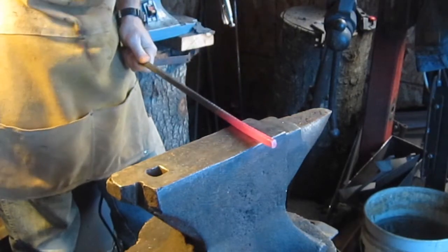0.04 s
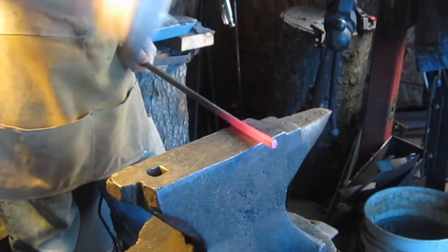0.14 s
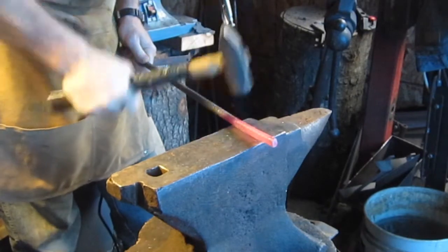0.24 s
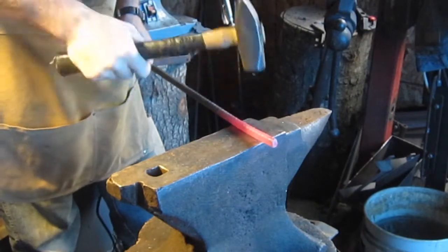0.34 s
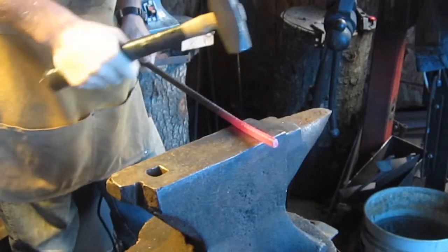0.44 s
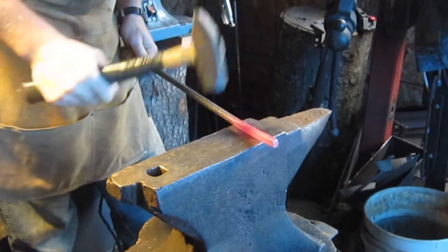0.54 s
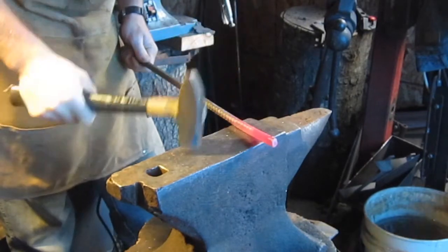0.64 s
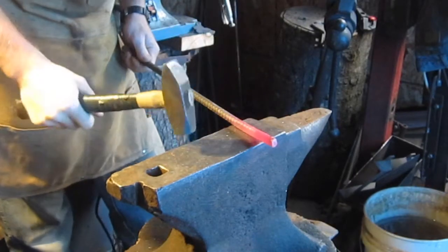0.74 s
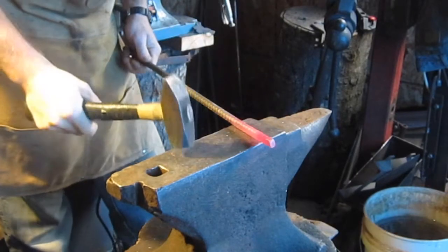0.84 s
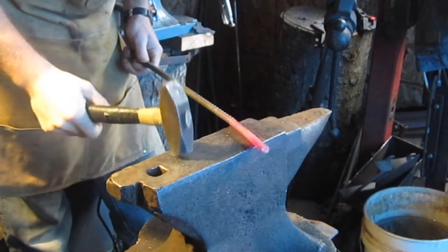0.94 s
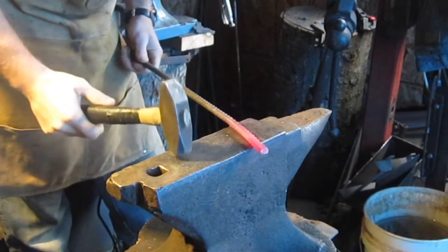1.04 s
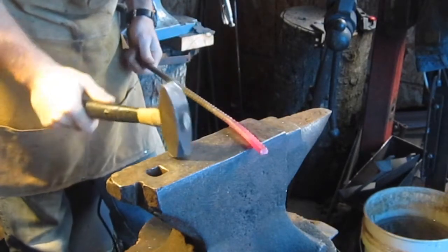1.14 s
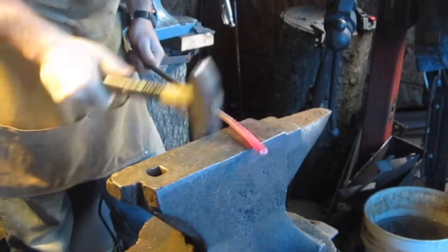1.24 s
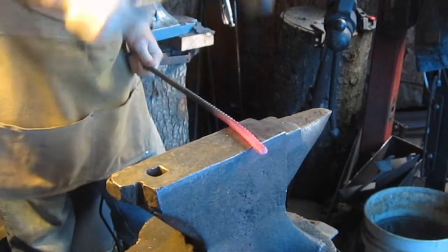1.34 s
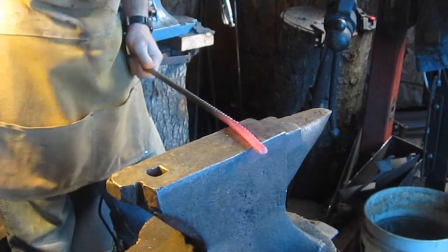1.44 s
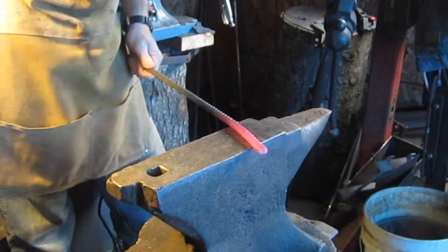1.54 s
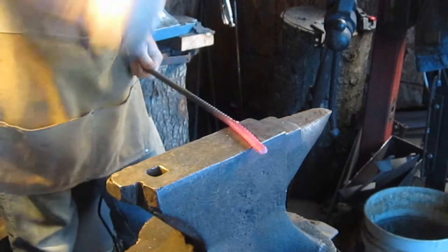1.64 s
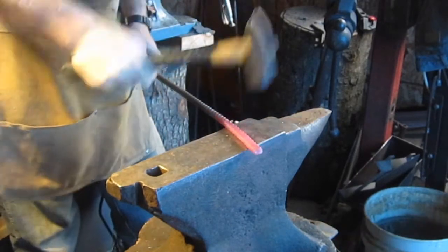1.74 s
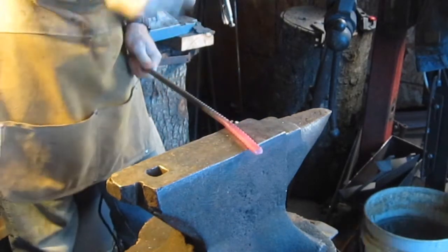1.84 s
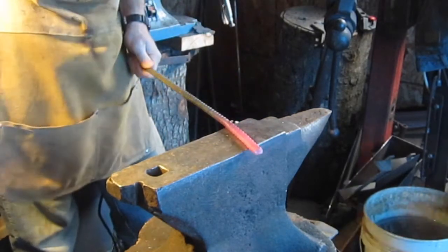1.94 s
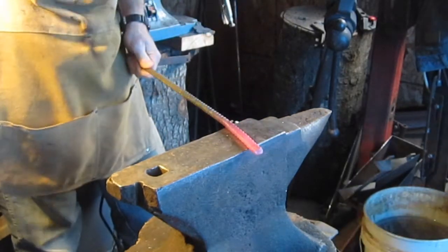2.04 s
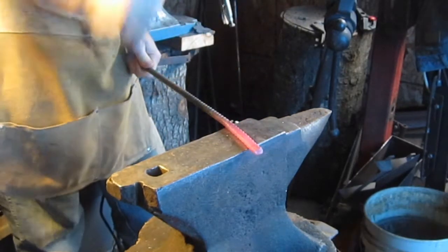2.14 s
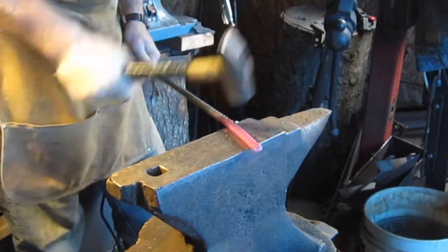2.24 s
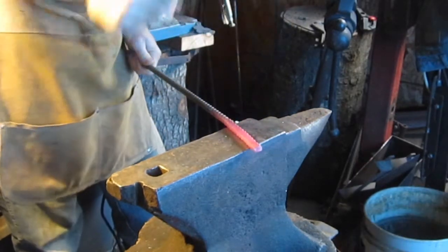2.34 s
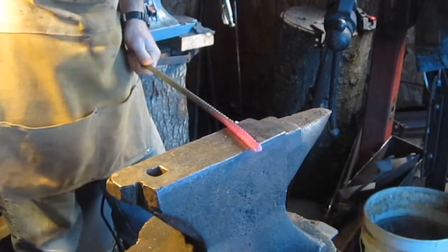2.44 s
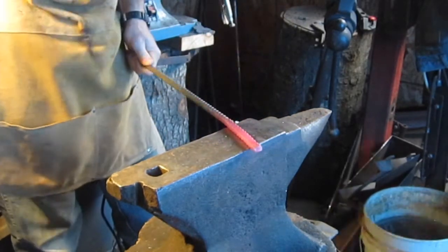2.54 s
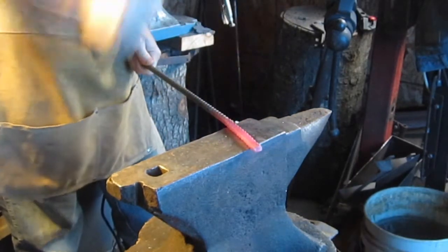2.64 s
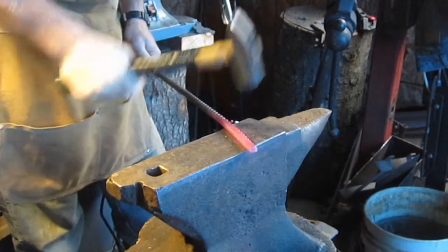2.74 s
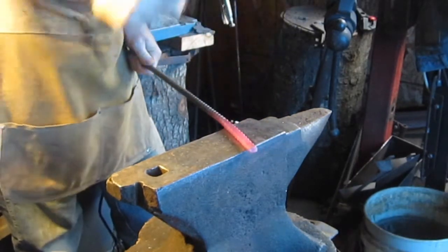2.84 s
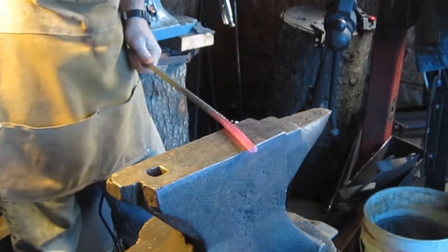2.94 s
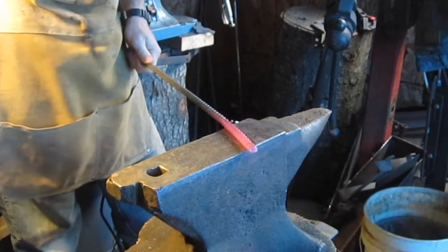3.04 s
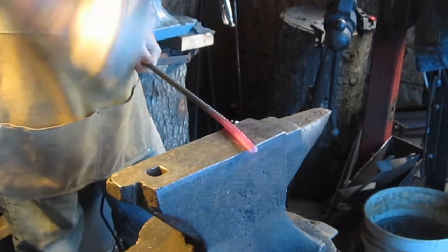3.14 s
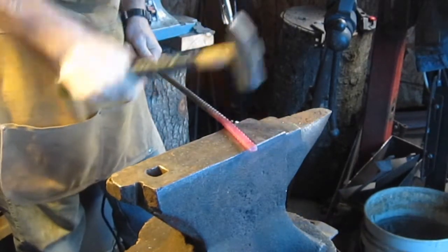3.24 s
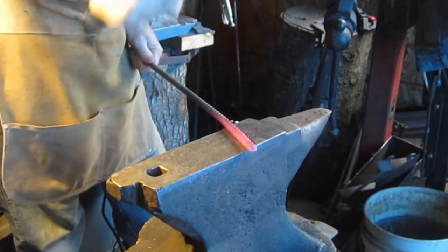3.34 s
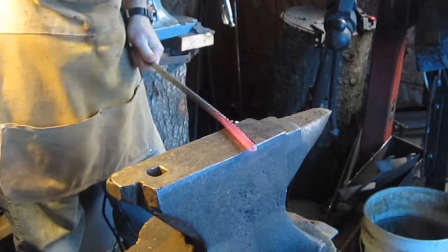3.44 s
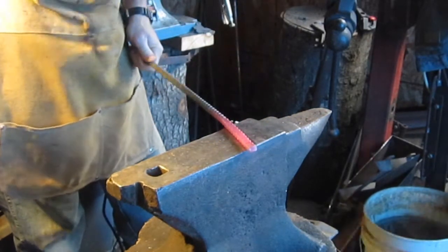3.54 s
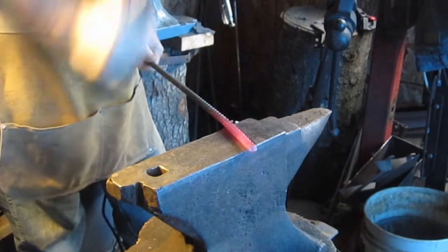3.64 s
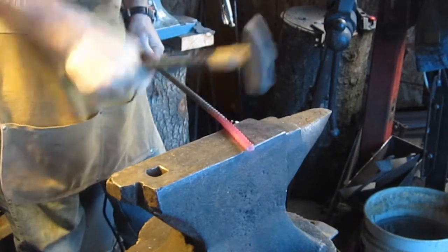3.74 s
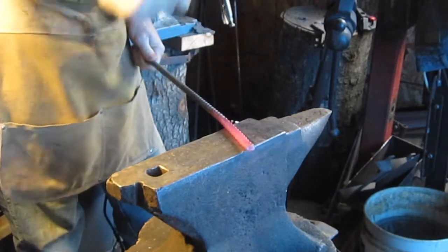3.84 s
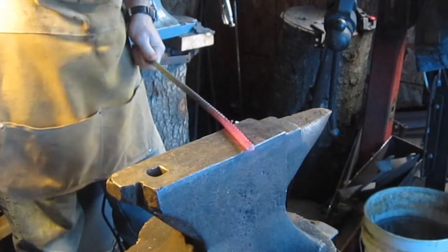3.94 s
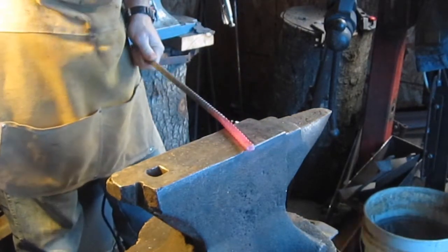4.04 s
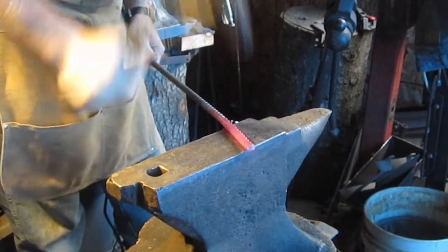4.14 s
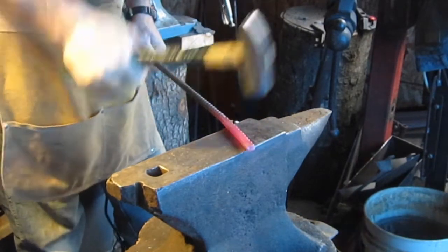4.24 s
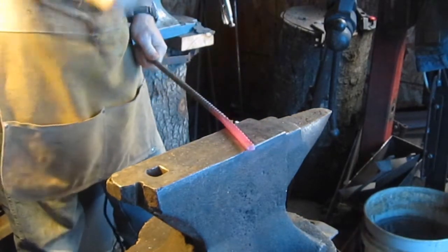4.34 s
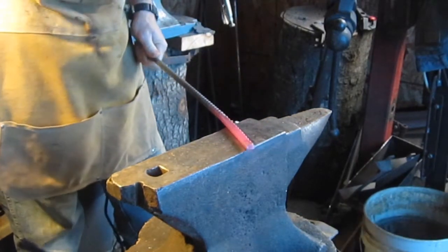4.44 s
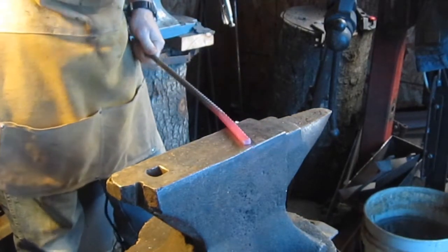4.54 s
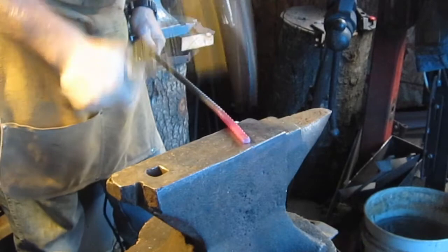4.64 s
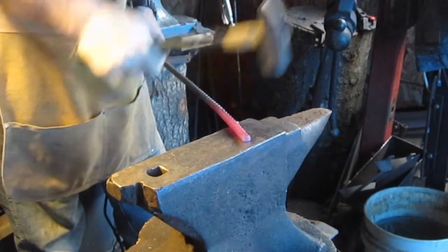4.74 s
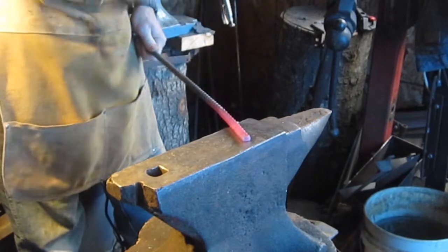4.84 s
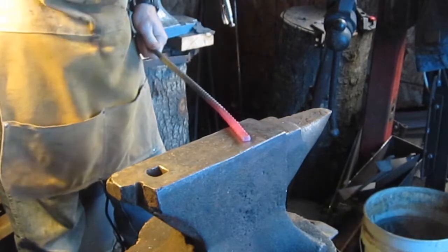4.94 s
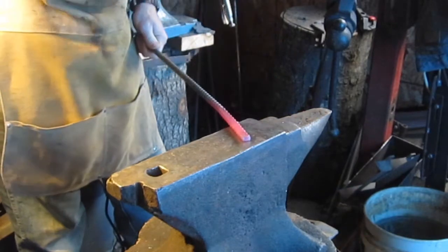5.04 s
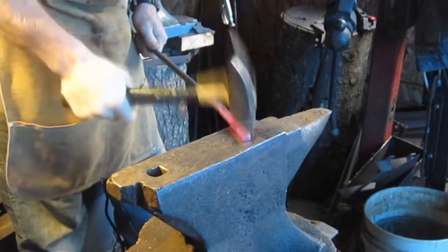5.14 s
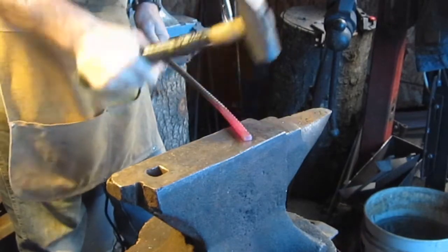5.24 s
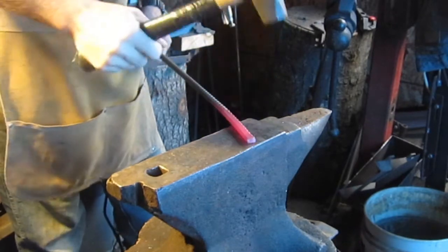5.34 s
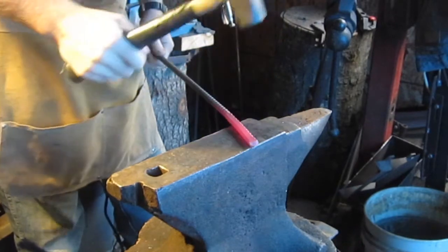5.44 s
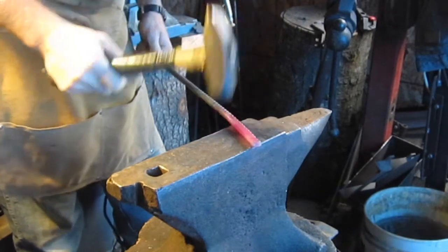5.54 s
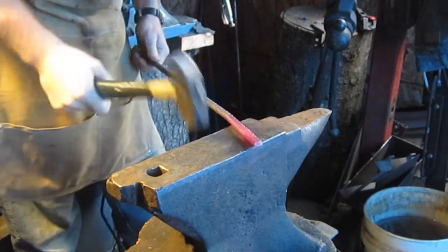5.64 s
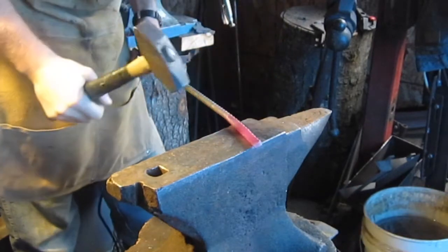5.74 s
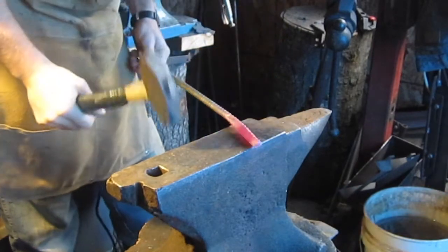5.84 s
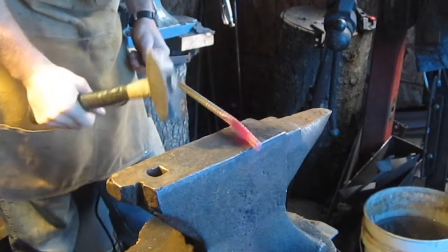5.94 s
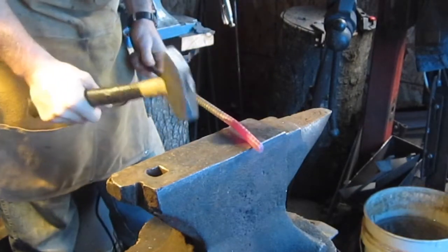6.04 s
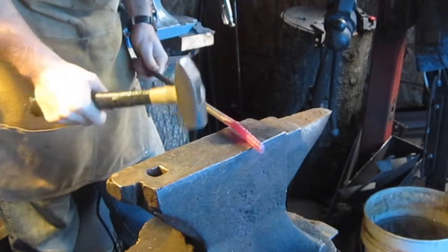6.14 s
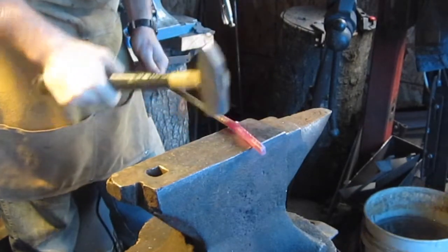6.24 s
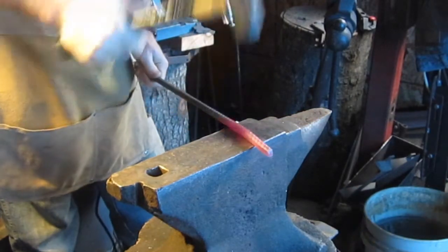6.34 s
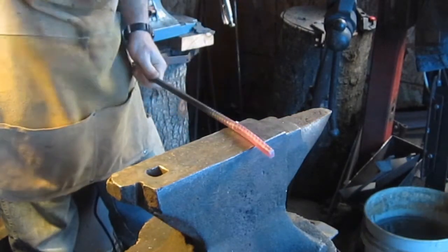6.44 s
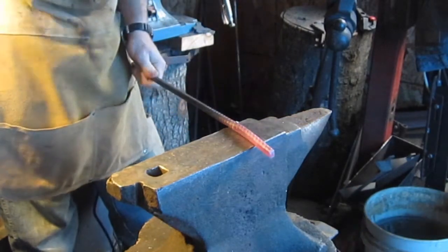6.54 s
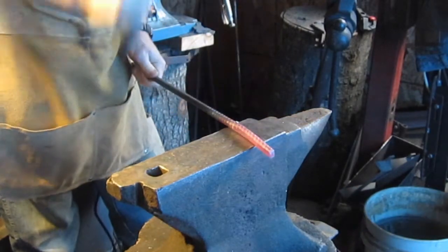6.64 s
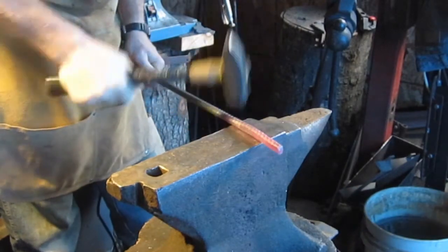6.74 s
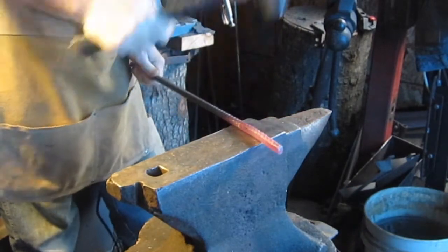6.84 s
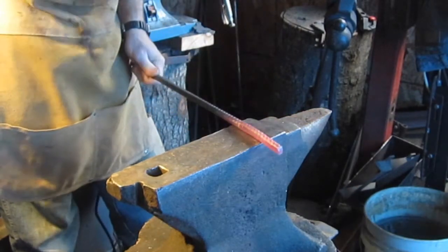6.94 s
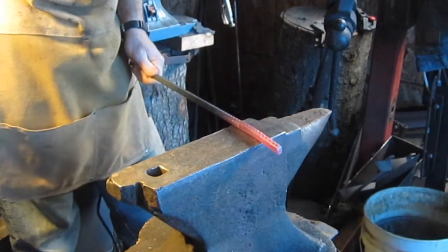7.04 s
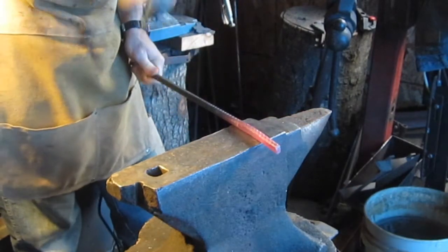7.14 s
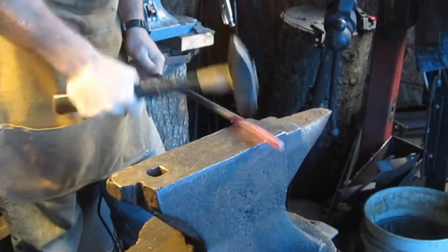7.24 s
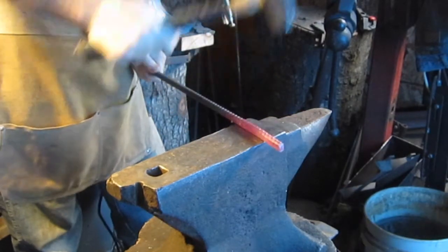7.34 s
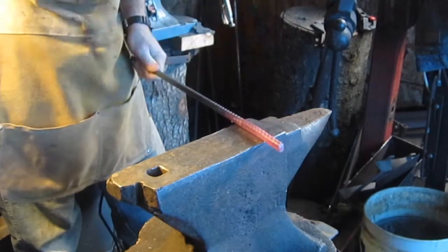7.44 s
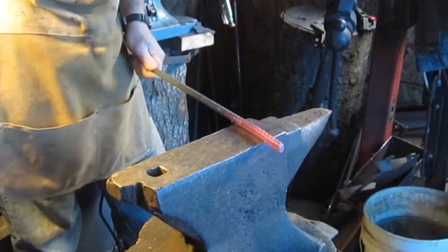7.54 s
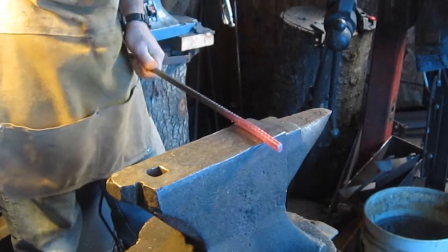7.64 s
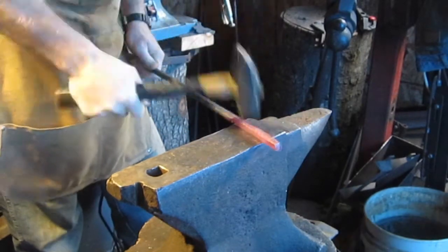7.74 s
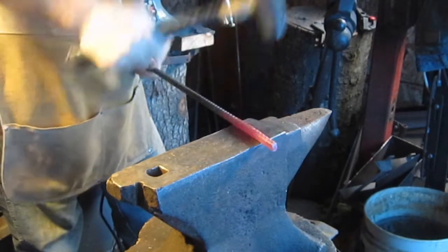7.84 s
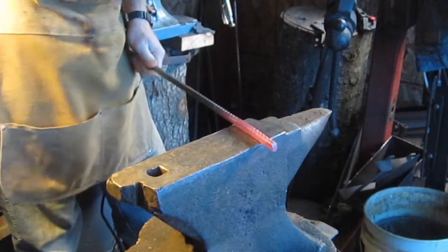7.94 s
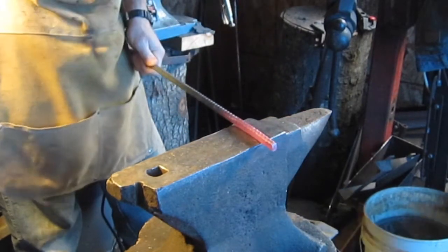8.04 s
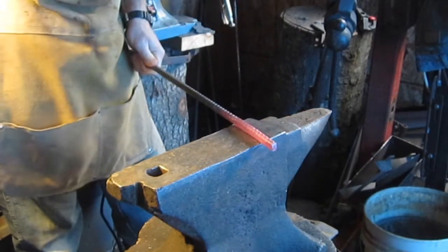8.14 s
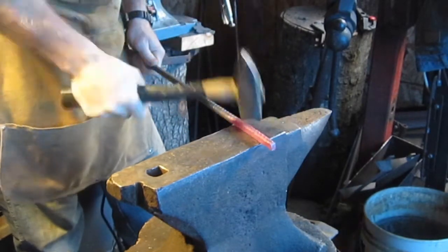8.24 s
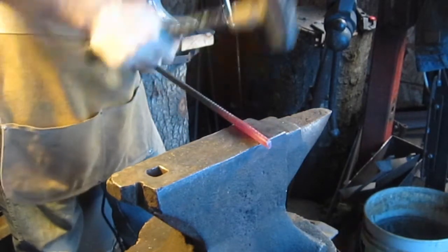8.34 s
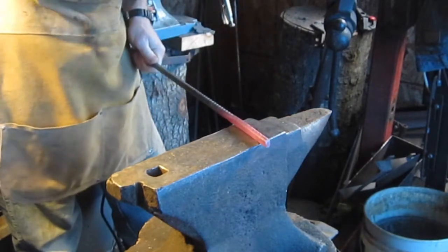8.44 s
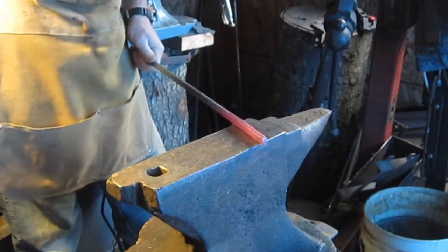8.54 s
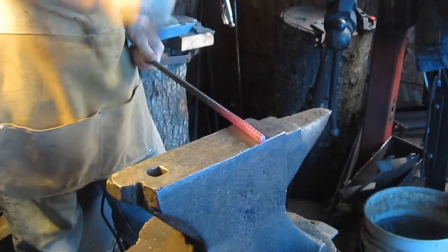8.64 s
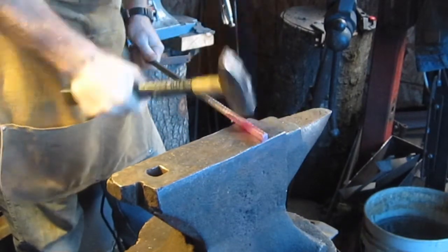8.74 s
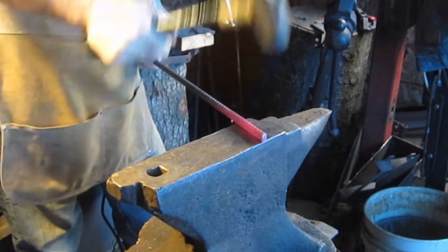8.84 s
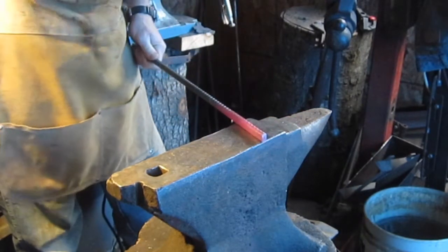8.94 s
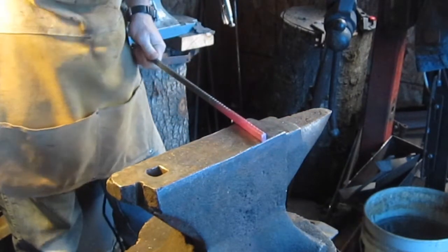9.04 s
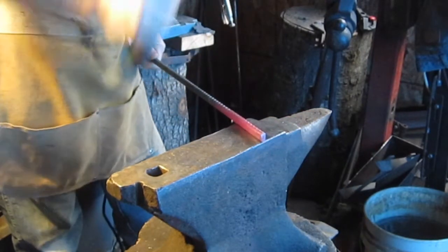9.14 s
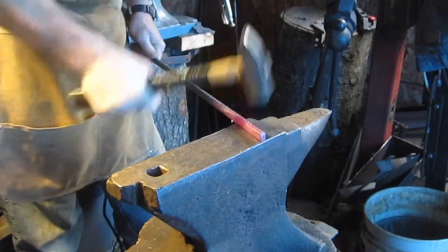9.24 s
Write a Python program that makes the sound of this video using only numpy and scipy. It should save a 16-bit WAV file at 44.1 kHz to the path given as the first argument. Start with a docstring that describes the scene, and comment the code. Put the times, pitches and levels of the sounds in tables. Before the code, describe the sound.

In a small workshop, a hammer lands one heavy blow on a hot steel bar, then drops on the bare anvil and bounces, faster and fainter. Eight steady blows follow, about two a second, then three lighter taps on the anvil and six more blows. Each clank leaves a brief, high ring. A forge rumbles softly throughout, and the hardest hits slightly overload the nearby microphone.

```python
"""A smith hammers a red-hot bar on an anvil in a small workshop, while the forge rumbles softly.
First comes one heavy blow; then the hammer drops on the bare anvil and bounces, ever faster.
Eight steady blows follow, then three light taps on the bare anvil, then six more blows.
Each stroke sets the steel ringing; a blow's tone follows where the bar lies and how squarely
the hammer lands. The hardest blows just overload a nearby microphone."""
import sys
import numpy as np
from scipy import signal
from scipy.fft import rfft, irfft
from scipy.io import wavfile
from scipy.ndimage import uniform_filter1d

SR = 44100
rng = np.random.default_rng(int(sys.argv[2]) if len(sys.argv) > 2 else 0)


def wav_out(sig):
    """Save sig, one row per channel (or a flat mono array), as 16-bit PCM at SR to the path in sys.argv[1]."""
    wavfile.write(sys.argv[1], SR, np.round(np.clip(np.atleast_2d(sig).T, -1, 1) * 32767).astype(np.int16))


N = 409235
SIZE = 32768  # samples in one stroke
HZ = np.fft.rfftfreq(SIZE, 1 / SR)
T = np.arange(SIZE) / SR


def amp(db):
    """Turns decibels into a gain."""
    return 10 ** (np.asarray(db) / 20)


def curve(points, hz):
    """Joins (Hz, value) points on a log-frequency axis."""
    point_hz, value = np.transpose(points)
    return np.interp(np.log(hz + 1), np.log(point_hz), value)


def unit(x):
    """Scales a signal to an average power of 1."""
    return x / np.sqrt(np.mean(x ** 2) + 1e-20)


def smooth(x, first, second):
    """Takes a running average twice, over these two lengths."""
    return uniform_filter1d(uniform_filter1d(x, first), second)


def add(mix, start_s, sound):
    """Mixes a sound in at its start time."""
    part = mix[round(start_s * SR):][:len(sound)]
    part += sound[:len(part)]


def peaks(modes, hz):
    """Gain of resonances (modes) that rise above a flat response; each is made at least 26 Hz wide."""
    power = sum(amp(db) ** 2 / (1 + (2 * (hz - f) / max(width, 26)) ** 2) for f, width, db in modes)
    return np.sqrt(1 + power)


def bump(centre_hz, octaves):
    """A smooth hill in the spectrum."""
    return np.exp(-.5 * (np.log2((HZ + 1) / centre_hz) / octaves) ** 2)


def causal(gain):
    """A spectrum with this gain that starts suddenly, then rings (minimum phase)."""
    log_gain = np.log(np.maximum(gain, 1e-5))
    mirrored = np.concatenate([log_gain, log_gain[-2:0:-1]])
    return np.exp(np.conj(signal.hilbert(mirrored)))[:len(gain)]


# The forge's rumble and hiss. Each row: frequency in Hz, relative level in dB.
FORGE_SPECTRUM = [(20, -17.5), (45, -8), (110, -12.5), (140, -5), (240, -9), (285, -17), (430, -8),
                  (620, -14), (850, -17), (1150, -26.5), (1900, -25.5), (3000, -34), (4000, -37),
                  (5000, -29), (6500, -38.5), (9300, -40), (11200, -33), (15500, -44.5)]
# Its low resonances and faint whistles. Each row: frequency in Hz, width in Hz, height in dB.
FORGE_PEAKS = [(240, 24, 9.5), (332, 34, 9), (420, 26, 9), (602, 20, 7), (8100, 35, 8.5), (10400, 36, 7),
               (11600, 77, -1)]


def forge(level_db=-50.5, flutter_db=0.82):
    """The forge gives a steady low roar and a thin hiss, fluttering a little."""
    hz = np.fft.rfftfreq(N, 1 / SR)
    colour = amp(curve(FORGE_SPECTRUM, hz)) * peaks(FORGE_PEAKS, hz)
    roar = irfft(rfft(rng.standard_normal(N)) * colour, N)
    flutter = unit(irfft(rfft(rng.standard_normal(N)) * np.exp(-(hz / 6) ** 2), N))
    return amp(level_db + flutter_db * flutter) * unit(roar)


# The room's echo. Each row: frequency in Hz, seconds to fade 60 dB, level over the direct sound in dB.
SHOP_ECHO = [(50, 0.43, 9), (130.1, 0.078, 14), (302, 0.036, 11.5), (690, 0.17, 2.5), (1770, 0.14, -0.5),
             (3130, 0.17, 0.5), (4870, 0.16, 9.5), (7950, 0.15, 5), (15000, 0.14, 9.5)]


def shop(walls, likeness=.85, direct_s=0.002, build_s=0.00029, gap_s=0.0014):
    """Spectrum of the path from anvil to microphone: a short direct burst, then dense echoes."""
    band_hz, fade_s, echo_db = np.transpose(SHOP_ECHO)
    # smith and hammer move, so the echoes change a little between strokes
    near, far = likeness * walls + np.sqrt(1 - likeness ** 2) * rng.standard_normal(walls.shape)
    # sound leaves the anvil's face, sides and horn at slightly different moments
    direct = near * np.exp(-(T / direct_s) ** 2)
    hz, t, bands = signal.stft(far, SR, nperseg=256)
    fade = amp(-60 * t / curve(np.c_[band_hz, fade_s], hz)[:, None])
    tail = signal.istft(bands * fade, SR, nperseg=256)[1][:SIZE]
    tail *= 1 - np.exp(-np.maximum(T - gap_s, 0) / build_s)
    echo_colour = causal(amp(curve(np.c_[band_hz, echo_db], HZ)))
    path = rfft(direct / np.linalg.norm(direct)) + echo_colour * rfft(tail / np.linalg.norm(tail))
    # echoes ripple the spectrum finely but leave its broad shape alone
    broad = np.sqrt(smooth(abs(path) ** 2, 70, 50))
    return path * causal(1 / broad)


def shudder(level_db, offset_db=-38, top_hz=80, peak_s=.03):
    """The floor under the stand heaves a moment after a heavy blow."""
    colour = peaks([(32, 26, 8.2)], HZ) * HZ / (HZ + 15) / (1 + (HZ / top_hz) ** 4)
    rumble = unit(irfft(rfft(rng.standard_normal(SIZE)) * colour))
    swell = T / peak_s * np.exp(1 - T / peak_s)
    return amp(level_db + offset_db) * rumble * swell


# The anvil's two long tones. Each row: frequency in Hz, seconds to fade 60 dB in a blow, rise in seconds.
LONG_TONES = [(2551, .27, .03), (3347, .28, .008)]


def ring(levels_db, longer=1):
    """The anvil sings on in two pure tones that swell in the room as the clank dies."""
    out = np.zeros(SIZE)
    for (hz, fade_s, rise_s), db in zip(LONG_TONES, levels_db):
        fade = amp(db - 60 * T / (fade_s * longer))
        swell = (1 - np.exp(-T / rise_s)) ** 2
        out += fade * swell * np.sin(2 * np.pi * (hz * T + rng.random()))
    return out


# The hammer head's tones. Each row: frequency in Hz, seconds to fade 60 dB, dB over a plain tap.
HAMMER_TONES = [(3320, 0.0128, 9), (12800, .025, -10)]


def clack(level_db, bright_db):
    """On bare steel the hammer head rings briefly, straight toward the microphone."""
    out = np.zeros(SIZE)
    for hz, fade_s, db in HAMMER_TONES:
        start_db = level_db + db + bright_db * min(hz / 13000, 1)
        out += amp(start_db - 60 * T / fade_s) * np.sin(2 * np.pi * hz * T)
    return out


# Resonances of the anvil's stand and the shop. Each row: frequency in Hz, width in Hz, height in dB.
STAND_MODES = [ (266, 45, 22.5), (300, 45, 16), (408, 37, 12), (495, 50, 7), (672, 33, 10), (1872, 30, 6),
               (2195, 30, 7), (830, 86, 4.5)]


def strike(spectrum, modes, path, level_db, bright_db, thud_db, clang_db, ping_db):
    """One contact sets steel and stand ringing; a square hit adds bright treble."""
    colour_db = thud_db * bump(330, 1.3) + clang_db * bump(3000, .4) + ping_db * bump(6000, .35)
    chance = unit(smooth(rng.standard_normal(len(HZ)), 150, 90))
    colour_db += 3.0 * chance * HZ / (HZ + 1800)  # no two hits stir the treble alike
    gain = amp(curve(spectrum, HZ) + colour_db) * peaks(STAND_MODES, HZ) * peaks(modes, HZ)
    strength = np.sqrt(np.sum(irfft(gain * path) ** 2) / (.05 * SR))  # as if spread over 50 ms
    treble = amp(bright_db * bump(12000, .5))
    return amp(level_db) * irfft(causal(gain * treble) * path) / strength


# Resonances of anvil and hammer head. Each row: frequency in Hz, width in Hz, then three heights in dB:
# for a blow with the bar at place 0, at place 1 (two spots on the anvil), and for a tap.
ANVIL_MODES = [ (929, 40, 9, 9, 18), (1715, 42, 4, 4, 14), (2838, 27, 3, 10, 23), (3295, 48, 1, 10, 14),
               (5003, 27, -3, 3, 26), (5243, 27, 11, 9, 29), (2450, 140, 0, 0.5, 24),
               (3250, 120, -6, -10.5, 18), (4140, 110, -3.5, 1.5, 8.7), (5930, 27, 0.5, 1.5, 14),
               (6000, 94, 4, 5.5, 26.4), (6740, 150, 4, -1, 20), (7320, 50, 1, 6, 8.9),
               (7500, 51, 0.5, 2.5, 12), (12730, 35, -0.5, -5, 9.3)]
# The tone of a tap's contact. Each row: frequency in Hz, relative level in dB.
TAP_CONTACT = [(40.0, -23.5), (120.0, -28), (250.0, -6.5), (560.0, -10), (1300.0, 2), (2400.0, -5.5),
               (3200.0, 1.5), (4600.0, 2.5), (6500.0, -15.5), (8200.0, -12.5), (11000.0, -11.5),
               (13200.0, -25), (14300.0, -19), (15500.0, -39.5)]
# Taps and bounces. Each row: start in seconds, level in dB, brightness in dB.
TAP_STROKES = [(0.6944, -26, 1.5), (0.8608, -23, 3), (0.979, -26, -8), (1.0657, -28.5, -8),
               (1.1318, -32, -8), (1.1927, -38, -10), (5.653, -19, 8), (5.927, -21.5, -1.5),
               (6.1503, -24, 0.5)]


def taps(walls, scatter_db=3.5, ring_db=(-16, -23.5)):
    """The hammer drops on the bare anvil, hard steel on hard steel: less crack, clearer tones."""
    out = np.zeros(N)
    for start_s, level_db, bright_db in TAP_STROKES:
        # each resonance answers a little differently every time
        modes = [(hz, width, db + scatter_db * rng.standard_normal())
                 for hz, width, *_, db in ANVIL_MODES]
        clank = strike(TAP_CONTACT, modes, shop(walls), level_db, bright_db,
                       thud_db=4, clang_db=1.5, ping_db=2.5 + 0.8 * bright_db)
        tones = ring(level_db + np.array(ring_db), longer=1.2)  # no hot bar to damp them
        add(out, start_s, clank + tones + clack(level_db, bright_db))
    return out


def at_place(pair, place):
    """Slides from the first value to the second as the bar moves over the anvil."""
    return pair[0] + (pair[1] - pair[0]) * place


# The bar's resonances. Each row: frequency in Hz, width in Hz, height in dB at place 0 and at place 1.
BAR_MODES = [(2510, 44, 1, -0.5), (3420, 73, 6, -4.5), (4100, 45, -3.5, 7.5), (4490, 100, 7, -4),
             (5530, 70, 20.5, -13.5), (6130, 110, -0.5, 9), (6680, 180, 14, 4), (7270, 160, 8.5, 11.5),
             (7920, 150, 17, 2.5), (8500, 150, 11.5, 10.5), (9330, 180, 13.5, 9), (9920, 90, 13, 9),
             (10840, 140, 11, 8.5), (11590, 200, 3, 8), (12400, 530, 4.5, 5.5), (13200, 160, 7.0, 4.5)]
# The smith shifts the bar. Each row: time in seconds, place on the anvil from 0 to 1.
BAR_PLACES = [(0.25, 0.04), (1.75, 0.53), (2.25, 1), (5.2, 1), (7.25, 0.04), (8.3, 0.07), (9.25, 0.16)]
# The tone of a blow's contact. Each row: frequency in Hz, relative level in dB.
BLOW_CONTACT = [(40, -31), (95, -23), (135, -12.5), (200, -15.5), (560, -9.5), (1300, -2.5), (2300, 2),
                (4000, 1), (6500, -9), (9000, -10), (12500, -11.5), (14500, -17.5), (15800, -19)]
# Blows on the hot bar. Each row: start in seconds, level in dB, brightness in dB,
# lean in dB (added to the upper long tone and taken from the lower).
BLOW_STROKES = [(0.2452, -15, -6, -0.5), (1.7428, -16.5, 0, -1.5), (2.2486, -15, -1.5, -5.5),
                (2.7405, -15, -2.5, -5), (3.2334, -15.5, 4, 2), (3.731, -15, -2.5, -1.5),
                (4.2152, -15.5, 4.5, -0.5), (4.707, -16, -3, -1.5), (5.1867, -14.5, -2, 0.5),
                (6.7657, -19, 3, -4.5), (7.276, -15, 2.5, 9), (7.7837, -14.5, -1.5, -3.5),
                (8.2849, -15.5, 1, -4), (8.7711, -15.5, 2.5, 3), (9.2622, -16, -3, -3)]


def blows(walls, pause_s=1.0, settle_blows=2.2, ring_db=(-8, -22)):
    """Soft hot steel damps the anvil; which resonances answer depends on where the bar lies."""
    out, last_s, in_run = np.zeros(N), -np.inf, 0
    # after a pause the bar is not yet beaten flat: more thud and less knock for a few blows
    soft_db = 2.0 * bump(280, 1) - 3 * bump(1600, .5)
    for start_s, level_db, bright_db, lean_db in BLOW_STROKES:
        in_run = 0 if start_s - last_s > pause_s else in_run + 1
        last_s = start_s
        contact_db = curve(BLOW_CONTACT, HZ) + soft_db * np.exp(-in_run / settle_blows)
        spectrum = np.c_[HZ + 1, contact_db]  # as (Hz, dB) points
        place = np.interp(start_s, *np.transpose(BAR_PLACES))
        modes = [(hz, width, at_place(heights, place))
                 for hz, width, *heights in [*ANVIL_MODES, *BAR_MODES]]
        clank = strike(spectrum, modes, shop(walls), level_db, bright_db, thud_db=-1,
                       clang_db=at_place((-2.5, 0), place), ping_db=at_place((1, 0.5), place))
        tones = ring(level_db + np.array(ring_db) + [-lean_db, lean_db])
        add(out, start_s, clank + tones + shudder(level_db))
    return out


def scene():
    """Blows and taps echo off the same walls, over the sound of the forge."""
    walls = rng.standard_normal((2, SIZE))
    return (blows(walls) + taps(walls) + forge())[None]


def record(dry, ceiling=.8, top_hz=15950):
    """Overload rounds off the loudest peaks; then the highest treble is cut."""
    rounded = dry / (1 + (dry / ceiling) ** 4) ** .25
    lowpass = signal.firwin(301, top_hz, window=("kaiser", 8), fs=SR)
    return signal.oaconvolve(rounded, lowpass[None], "same")


dry = scene()
out = record(dry)
wav_out(out)
```